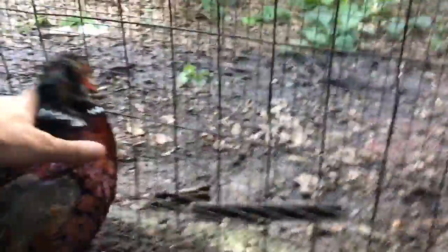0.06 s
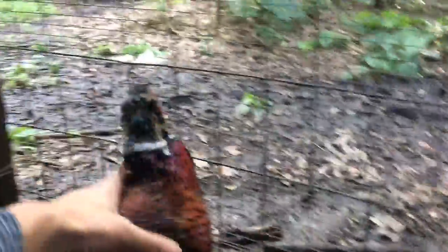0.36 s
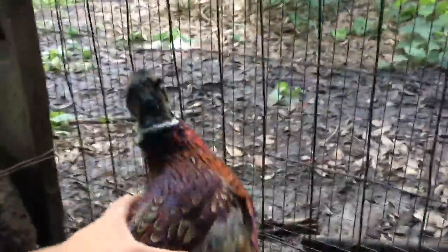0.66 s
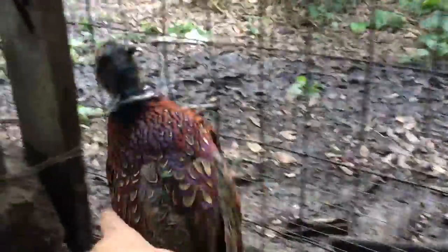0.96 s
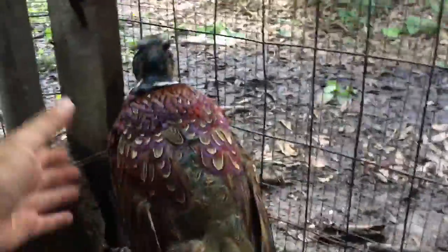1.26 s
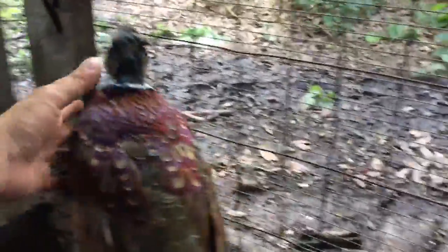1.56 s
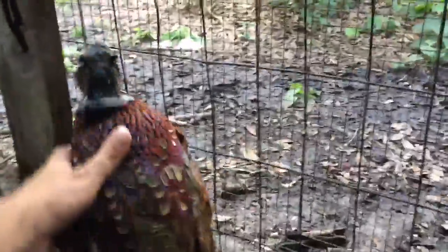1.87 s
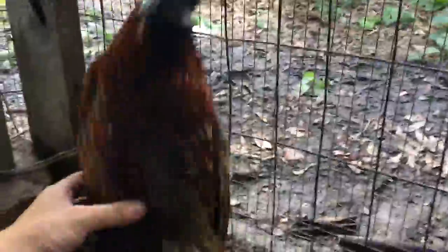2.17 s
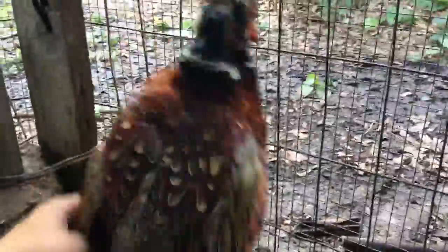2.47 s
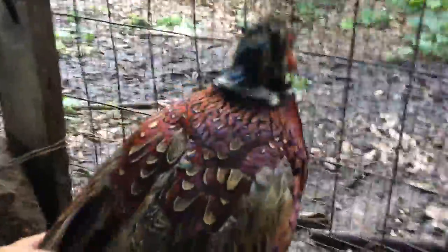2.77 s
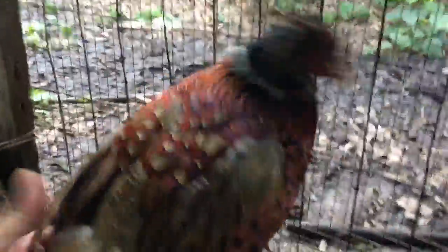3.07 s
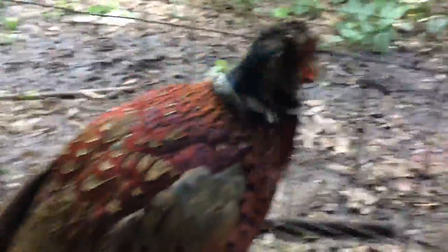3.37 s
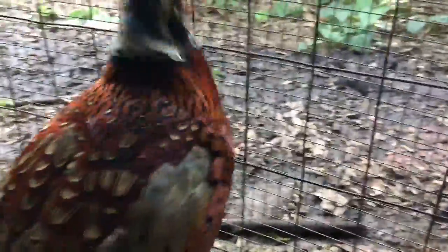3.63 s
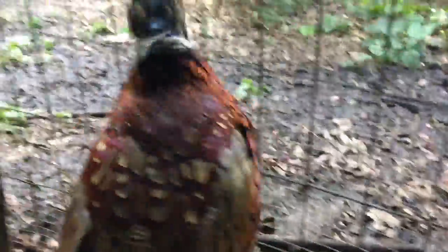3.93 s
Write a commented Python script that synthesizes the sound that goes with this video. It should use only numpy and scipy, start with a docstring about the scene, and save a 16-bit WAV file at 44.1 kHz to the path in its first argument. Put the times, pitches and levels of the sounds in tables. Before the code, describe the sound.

High, falling pheasant whistles mix with peeps and low clucks, broken halfway by a short raspy squawk. A hand brushes feathers near the microphone and dry leaves and twigs crackle, with a low outdoor rumble behind.

```python
"""In a wire pen strewn with dry leaves, a pheasant is handled close by.
Birds give long falling whistles, short peeps, soft clucks, a hoarse chirp and one harsh squawk made
with both sides of the voice box. Twigs and leaves snap and crunch in showers of tiny breaks, and a
hand rubs over feathers. Birds, twigs and leaves echo briefly around the pen; faint high squeaks,
a low rumble and quiet outdoor air lie behind them."""
import sys
import numpy as np
from scipy import signal
from scipy.fft import rfft, irfft, next_fast_len
from scipy.io import wavfile

SR = 44100
rng = np.random.default_rng(int(sys.argv[2]) if len(sys.argv) > 2 else 0)


def digitize_waveform(pressure):
    """Quantize a signal to 16-bit integers and store it at the path in sys.argv[1].

    Rows of a 2-D input are taken as channels; values are limited to [-1, 1].
    """
    field = np.atleast_2d(pressure).T
    bounded = np.clip(field, -1, 1)
    quanta = np.round(bounded * 32767).astype(np.int16)
    wavfile.write(sys.argv[1], SR, quanta)


N = 176400  # 4 seconds


# Long falling whistles, one list of points each: (time [s], pitch [Hz], level [dB])
WHISTLE_PATHS = [
    [(.21, 4480, -70), (.25, 4360, -61), (.312, 3780, -58.5), (.321, 3600, -68), (.326, 3460, -61.5),
     (.356, 3120, -51.5), (.39, 2934, -60), (.41, 2640, -57), (.43, 2270, -45.5), (.442, 2120, -55)],
    [(1.04, 4650, -68), (1.11, 4370, -64), (1.14, 3830, -61), (1.17, 3674, -49.5), (1.2, 3500, -50.5),
     (1.236, 3240, -51.5), (1.254, 2850, -64.5), (1.275, 2570, -47), (1.29, 2450, -62)],
    [(2.423, 3600, -57), (2.47, 3570, -62), (2.515, 3243, -59), (2.526, 3070, -60), (2.53, 2690, -52.5),
     (2.548, 2586, -47.5), (2.561, 2460, -48)],
    [(3.26, 4560, -64), (3.28, 4580, -62.5), (3.335, 4190, -62), (3.352, 3900, -72), (3.38, 3350, -56),
     (3.387, 3140, -48.5), (3.412, 2764, -66), (3.424, 2483, -50.5), (3.447, 2210, -60)],
]
# The overtone an octave above each whistle: (level against the main tone [dB])
WHISTLE_OCTAVES = [-24, -33, -36, -27]
# Short thin peeps: (start [s], length [s], first pitch [Hz], last pitch [Hz], level [dB])
PEEP_NOTES = [(0.362, 0.094, 4130, 3500, -71), (1.676, 0.058, 3770, 3120, -64),
              (3.628, 0.053, 2930, 2930, -65.5), (3.671, 0.035, 3070, 2990, -58.5)]

def whistles():
    """Birds give long falling whistles and short peeps."""
    out = np.zeros(N)
    for path, octave_db in zip(WHISTLE_PATHS, WHISTLE_OCTAVES):
        start, (hz, db) = curve(path)
        add(out, start, whistle(hz, db, octave_db))
    for start, length, first_hz, last_hz, db in PEEP_NOTES:
        n = int(length * SR)
        add(out, start, whistle(np.linspace(first_hz, last_hz, n), db) * fade(n, 0.012))
    return out


def whistle(hz, db, octave_db=-34, buzz_hz=330, clean_db=-47.5, flutter_db=3.0):
    """One trembling bird note: buzzy where it is soft, nearly clean above clean_db."""
    n = len(hz)
    softness = np.clip((clean_db - db) / 14, .2, 1)
    tremble = 0.012 * (.5 + softness) * wobble(n, 450)
    waver = 0.00754 * wobble(n, 60)
    hz = hz * (1 + tremble + waver)
    buzz = 0.28 * softness * tone(buzz_hz * (1 + 0.243 * wobble(n, 80)))
    loudness = amp(db + flutter_db * wobble(n, 80) - 0.85) * fade(n, .004)
    return loudness * unit(1 + buzz) * (tone(hz) + amp(octave_db) * tone(2 * hz))


# The squawk's two voices:
# (time [s], low pitch [Hz], low level [dB], high pitch [Hz], high level [dB], roughness [0-1])
SQUAWK_PATH = [(1.766, 2614, -71, 4380, -63, 0.3), (1.786, 2650, -54, 4800, -58.5, 0.77),
               (1.81, 2780, -57, 5160, -53, 1), (1.824, 2654, -51, 4850, -59, 0.84),
               (1.834, 2463, -44, 4430, -49.5, 0.97), (1.853, 2155, -44.5, 4000, -48.5, 0.7),
               (1.868, 1870, -51.5, 3870, -62.5, 1), (1.883, 1425, -54, 3940, -70, 0.9),
               (1.895, 1260, -58, 3900, -74, 0.5)]
# Tone colour of the hiss in the squawk: (frequency [Hz], level [dB])
SQUAWK_HISS_COLOUR = [(1000, -38), (6000, 0), (8600, -2), (10000, -17), (18000, -40)]

def squawk(rasp_hz=391, jitter=0.028, sum_db=-16, hiss_db=-12):
    """The two sides of a bird's voice box rise and fall together, rasping and hissing."""
    out = np.zeros(N)
    start, (low_hz, low_db, high_hz, high_db, roughness) = curve(SQUAWK_PATH)
    n = len(low_hz)
    shake = 1 + jitter * roughness * wobble(n, 900)
    rattle = tone(rasp_hz * (1 + 0.235 * wobble(n, 153.6)))
    rasp = roughness * (rattle + 0.96 * wobble(n, 300))
    low_voice = amp(low_db) * tone(low_hz * shake) * (1 + 0.71 * rasp)
    sum_tone = amp(sum_db) * tone((low_hz + high_hz) * shake)  # the two pitches added make a third
    high_voice = (tone(high_hz * shake) + sum_tone) * (1 + 0.35 * rasp)
    hiss = 2 * roughness * amp(hiss_db) * colour(rng.standard_normal(n), SQUAWK_HISS_COLOUR)
    call = low_voice + amp(high_db) * (high_voice + hiss)
    add(out, start, amp(-2.0) * call * fade(n, .004))
    return out


# Soft clucks: (start [s], length [s], pitch [Hz], level [dB], change to harmonics 3 and up [dB])
CLUCK_NOTES = [(0.217, 0.035, 545, -55, -6), (0.681, 0.067, 538, -59, 9.5), (1.254, 0.051, 532, -57, 3),
               (1.298, 0.042, 512, -49, -13), (1.33, 0.029, 544, -52, -12), (1.441, 0.073, 532, -57.5, 2),
               (1.502, 0.059, 504, -50.5, -8.5), (2.315, 0.047, 505, -49.5, -18),
               (2.671, 0.034, 510, -53, -1), (2.693, 0.043, 603, -58, -7), (3.261, 0.063, 525, -61, 31),
               (3.384, 0.036, 629, -55, -2), (3.815, 0.096, 515, -57, -25)]
# A cluck's harmonics, the tones at 1 to 6 times its pitch: (level [dB])
CLUCK_HARMONICS = [-4.5, -1, -9, -8.5, -18.5, -13.5]

def clucks(dip=0.0687, jitter=0.026):
    """Low notes made with the beak closed, each dipping in pitch halfway through."""
    out = np.zeros(N)
    for start, length, pitch, db, upper_db in CLUCK_NOTES:
        n = int(length * SR)
        hz = pitch * (1 + dip * np.linspace(-1, 1, n) ** 2 + jitter * wobble(n, 180))
        note = sum(amp(harmonic_db + upper_db * (k >= 3)) * tone(k * hz)
                   for k, harmonic_db in enumerate(CLUCK_HARMONICS, start=1))
        add(out, start, amp(db) * unit(note) * fade(n, 0.016))
    return out


def chirp(start_s=2.467, length_s=.04, first_hz=5000, last_hz=4560, db=-54, jitter=.06):
    """One sudden falling bird note, hoarse because its pitch shakes very fast."""
    out, n = np.zeros(N), int(length_s * SR)
    hz = np.linspace(first_hz, last_hz, n) * (1 + jitter * wobble(n, 1000))
    add(out, start_s, amp(db) * tone(hz) * np.linspace(1, .2, n) * fade(n, 0.0019))
    return out


# Snapping twigs and leaves:
# (time [s], body [dB], middle [dB], treble [dB], fade time [s], tick [dB], ring pitch [Hz])
TWIG_SNAPS = [(.438, -52, -50.5, -54.5, 0.015, -50, 2190), (0.868, -48, -49, -59, 0.0071, -63, 3790),
              (1.048, -64, -55, -56, 0.01, -66, 3530), (1.111, -52.5, -58.5, -68, 0.021, -72, 2020),
              (1.394, -53.5, -57.5, -58, 0.04, -64, 3180), (2.005, -51.5, -45, -49, .023, -58, 2070),
              (2.093, -41.5, -46, -61, 0.022, -59, 1896), (2.178, -49.5, -43, -45, 0.022, -46, 2610),
              (2.231, -46.5, -61, -50, 0.0034, -42, 2970), (2.349, -50, -55, -70, .0038, -62, 1490),
              (2.374, -66, -57.5, -56, 0.018, -60, 3540), (2.388, -55.5, -47, -56, 0.029, -68, 2060),
              (2.471, -55.5, -46.5, -60, 0.017, -66, 2200), (2.669, -50, -53, -76, 0.0051, -73, 1840),
              (2.851, -49, -51, -49, 0.0045, -61, 2250), (2.864, -45.5, -53.5, -75, 0.017, -78, 1880),
              (2.977, -57.5, -52.5, -50.5, 0.028, -57, 2160), (3.306, -70, -56, -56, .003, -65, 3500),
              (3.775, -42.5, -48, -51, 0.0041, -36, 1880), (3.939, -48, -45.5, -56, .0063, -35.5, 1650)]
# Tone colour of a snap's low body: (frequency [Hz], level [dB])
BODY_COLOUR = [(100, -35), (400, -2.5), (750, 0), (1100, 4.5), (1600, -4.5), (2500, -7), (4500, -16.5),
               (18000, -74)]
# Tone colour of its middle: (frequency [times the ring pitch], level [dB])
MIDDLE_COLOUR = [(.05, -31), (.55, -23), (.8, -2), (1.15, 0.5), (1.5, -11), (1.85, -10), (2.4, -13),
                 (9, -65)]
# Tone colour of its treble: (frequency [Hz], level [dB])
TREBLE_COLOUR = [(100, -51), (4800, -24), (6000, 2), (8500, 2.5), (10200, -4.5), (11500, 1.5), (14000, -10),
                 (18000, -11.5)]
# Tone colour of its bright opening tick: (frequency [Hz], level [dB])
TICK_COLOUR = [(100, -50), (5000, -5), (8000, -2), (11500, 8), (14500, 8), (18000, 4)]
# The notes a twig rings with: (pitch [times the ring pitch], level [dB], time to fall 60 dB [s])
TWIG_NOTES = [(.73, -9.5, 0.031), (1, 7, 0.052), (1.27, -6.5, 0.041)]

def snaps(crack_s=0.00096, tick_s=0.0008, tick_tail_s=0.011, tick_tail_db=-27, knock_db=-10):
    """A twig or leaf breaks with a tick, a ringing knock and a crumble whose treble dies first."""
    out, t = np.zeros(N), np.arange(SR // 5) / SR
    rise = np.minimum(t / 0.00028, 1)
    crack = 0.54 * np.exp(-t / crack_s)
    tick_shape = rise * (np.exp(-t / tick_s) + amp(tick_tail_db) * np.exp(-t / tick_tail_s))
    for start, body_db, middle_db, treble_db, fade_s, tick_db, ring_hz in TWIG_SNAPS:
        middle_colour = [(ratio * ring_hz, db) for ratio, db in MIDDLE_COLOUR]
        bands = [(body_db, BODY_COLOUR, fade_s),
                 (middle_db, middle_colour, fade_s),
                 (treble_db, TREBLE_COLOUR, fade_s / 2)]
        for db, band_colour, band_fade_s in bands:
            shape = rise * (np.exp(-t / band_fade_s) + crack)
            crumble = colour(crackle(len(t), per_s=2400, spread_db=2.15, hiss=0.56), band_colour)
            add(out, start, amp(db) * shape * crumble)
        knock = sum(amp(db - 60 * t / ring_s) * np.sin(2 * np.pi * ratio * ring_hz * t)
                    for ratio, db, ring_s in TWIG_NOTES)
        tick = tick_shape * colour(rng.choice([-1., 1.], len(t)), TICK_COLOUR)
        add(out, start, amp(middle_db + knock_db) * knock + amp(tick_db) * tick)
    return out


# Soft crunches in the dry leaves: (start [s], length [s], level [dB])
LEAF_CRUNCHES = [(0.155, 0.15, -59.5), (0.452, 0.07, -52.5), (0.689, 0.045, -57.5), (0.871, 0.048, -59),
                 (1.124, 0.049, -58.5), (2.284, 0.049, -48.5), (2.413, 0.15, -59), (2.804, 0.04, -53.5),
                 (2.992, 0.061, -56.5), (3.472, 0.072, -50), (3.784, 0.031, -51.5), (3.941, 0.03, -49.5)]
# Tone colour of a crunch: (frequency [Hz], level [dB])
CRUNCH_COLOUR = [(100, -24), (350, 5.5), (700, -1.5), (1100, 3.5), (2200, 0), (3200, -5.5), (5000, -13),
                 (10000, -18.5), (18000, -28)]

def crunches():
    """Leaves are pressed down: many tiny breaks swell quickly, then fade."""
    loudness = np.zeros(N)
    for start, length, db in LEAF_CRUNCHES:
        progress = np.linspace(0, 1, int(length * SR))
        add(loudness, start, amp(db) * abs(np.sin(np.pi * progress ** 0.38)))
    return loudness * colour(crackle(N, per_s=1800, spread_db=2.8, hiss=0.76), CRUNCH_COLOUR)


# How loudly the hand brushes the feathers: (time [s], level [dB])
HAND_STROKES = [(0, -62), (.14, -72), (.42, -72), (.62, -64), (.77, -63.5), (.98, -59.5), (1.17, -63.5),
                (1.331, -70), (1.97, -66.5), (2.14, -57), (2.3, -55.5), (2.47, -55.5), (2.6, -59.5),
                (2.74, -67), (2.9, -58), (2.95, -65), (3.14, -67), (3.23, -61), (3.34, -66.5),
                (3.51, -57.5), (3.68, -61), (3.76, -67), (3.89, -59), (4, -64.5)]
# Tone colour of rubbed feathers: (frequency [Hz], level [dB])
FEATHER_COLOUR = [(100, -25), (450, 13), (1000, 7.5), (2200, 3.5), (3500, 0.5), (5500, -1.5), (10200, -6),
                  (15000, -7), (18000, -16)]

def feathers(patchy_db=2.3, split_hz=4500):
    """A hand rubs feathers: soft scrapes and the crisp crackle of barbs come and go separately."""
    def rubbing():
        patches = amp(patchy_db * wobble(N, 35))
        return patches * colour(crackle(N, per_s=900, spread_db=3.2, hiss=1.0), FEATHER_COLOUR)

    scrapes = signal.lfilter(*signal.butter(2, split_hz, "low", fs=SR), rubbing())
    barbs = signal.lfilter(*signal.butter(2, split_hz, "high", fs=SR), rubbing())
    return amp(over_time(HAND_STROKES) - 1.5) * (scrapes + barbs)


# Faint high squeaks: (start [s], length [s], first pitch [Hz], last pitch [Hz], level [dB])
SQUEAK_NOTES = [(0.552, 0.21, 11750, 11500, -73), (0.58, 0.17, 9700, 9800, -76),
                (.72, 0.14, 9150, 9050, -78)]

def squeaks(fuzz_hz=330):
    """Thin, very high tones, fuzzy because their strength flickers fast."""
    out = np.zeros(N)
    for start, length, first_hz, last_hz, db in SQUEAK_NOTES:
        n = int(length * SR)
        glide = tone(np.linspace(first_hz, last_hz, n))
        add(out, start, amp(db) * glide * wobble(n, fuzz_hz) * fade(n, 0.036))
    return out


# Tone colour of the low rumble: (frequency [Hz], level [dB])
RUMBLE_COLOUR = [(20, -36), (31, -29), (45, -0.5), (65, 0.5), (85, 0), (120, -2.5), (160, -7.5), (240, -14),
                 (385, -20), (470, -27), (700, -50.5), (2000, -84)]
# How the rumble swells and sinks: (time [s], level change [dB])
RUMBLE_SWELLS = [(0, -1), (.25, 0), (.5, 1.5), (.72, 0), (.85, 0.5), (1.05, 2.5), (1.4, -0.5), (1.68, -4.5),
                 (1.85, 0), (2.15, -0.5), (2.32, 4.5), (2.6, 2.5), (2.88, -5), (3.02, 1), (3.3, -1.5),
                 (3.55, 1), (4, 1.5)]
# Tone colour of the outdoor air: (frequency [Hz], level [dB])
AIR_COLOUR = [(100, -12), (300, 0), (500, -1.5), (750, -1.5), (1500, -3), (3000, -10), (5000, -18),
              (9000, -22), (14000, -24), (18000, -33)]

def background(rumble_db=-44.5, waver_db=1.02, air_db=-63):
    """A low rumble swells and sinks under the steady hush of outdoor air."""
    swell_db = over_time(RUMBLE_SWELLS) + waver_db * wobble(N, 11)
    rumble = amp(rumble_db + swell_db) * colour(rng.standard_normal(N), RUMBLE_COLOUR)
    air = amp(air_db) * colour(rng.standard_normal(N), AIR_COLOUR)
    return rumble + air


# Echoes from posts and walls: (delay [s], level before echo_db is added [dB])
PEN_ECHOES = [(.0072, -16.5), (.015, -35), (.027, -11.5), (.046, -20.5)]
# How long sound lingers in the pen: (frequency [Hz], time to fall 60 dB [s])
PEN_FADE_TIMES = [(200, 0.51), (1000, 0.25), (2500, 0.21), (5000, 0.1), (10000, 0.11), (18000, 0.08)]

def pen(sound, tail_db, echo_db):
    """Sound arrives directly, then as a few near echoes and a short, blurred tail."""
    n = SR // 2
    scatter = rng.standard_normal(n) * (rng.random(n) < .1)
    hz, t, bands = signal.stft(scatter, SR, nperseg=256)
    fade_s = at_frequency(PEN_FADE_TIMES, hz)[:, None]
    tail = signal.istft(bands * amp(-60 * t / fade_s), SR, nperseg=256)[1]
    tail *= np.minimum(np.arange(len(tail)) / SR / 0.0038, 1) ** 2  # the tail eases in
    response = amp(tail_db) * tail / np.linalg.norm(tail)
    response[0] += 1  # the direct sound
    for delay, db in PEN_ECHOES:
        add(response, delay, amp(db + echo_db) * np.array([.25, .5, .25]))  # a slightly dulled copy
    return signal.fftconvolve(sound, response)[:N]


def amp(db):
    """Turns decibels into a number to multiply by."""
    return 10 ** (np.asarray(db) / 20)


def unit(x):
    """Scales a signal to an average strength (rms) of 1."""
    return x / np.sqrt(np.mean(x ** 2) + 1e-20)


def tone(hz):
    """A pure tone of strength 1 that follows a pitch curve."""
    return np.sqrt(2) * np.sin(2 * np.pi * np.cumsum(hz) / SR)


def crackle(size, per_s, spread_db, hiss):
    """Tiny clicks of uneven size over a smooth hiss."""
    hits = rng.random(size) < per_s / SR
    strengths = amp(spread_db * np.minimum(rng.exponential(1, size), 4))
    clicks = hits * strengths * rng.choice([-1, 1], size)
    return unit(clicks) + hiss * rng.standard_normal(size)


def wobble(size, hz):
    """A smooth random wiggle, up to about hz times a second."""
    step = max(int(SR / (10 * hz)), 1)
    n = next_fast_len(size // step + 200)
    keep_slow = np.exp(-(np.fft.rfftfreq(n, step / SR) / hz) ** 2)
    slow = unit(irfft(rfft(rng.standard_normal(n)) * keep_slow, n))
    return np.interp(np.arange(size) / step, np.arange(n), slow)


def colour(x, points):
    """Gives a signal a tone colour (its balance of lows and highs), at strength 1."""
    gains = amp(at_frequency(points, np.fft.rfftfreq(len(x), 1 / SR)))
    return unit(irfft(rfft(x) * gains, len(x)))


def at_frequency(points, hz):
    """Reads between a table's frequencies, with octaves evenly spaced."""
    frequencies, values = np.transpose(points)
    return np.interp(np.log(hz + 1), np.log(frequencies), values)


def over_time(points):
    """Joins (time, value) points with straight lines across the whole scene."""
    return np.interp(np.arange(N) / SR, *np.transpose(points))


def curve(rows):
    """Gives a path's start time and its other columns at every sample."""
    times, *columns = np.transpose(rows)
    t = np.arange(times[0], times[-1], 1 / SR)
    return times[0], [np.interp(t, times, column) for column in columns]


def fade(size, edge_s):
    """A soft start and end."""
    k = np.arange(size)
    return np.sin(np.pi / 2 * np.clip(np.minimum(k, size - k) / (edge_s * SR), 0, 1)) ** 2


def add(mix, start_s, sound):
    """Mixes a sound in at a given time."""
    part = mix[max(round(start_s * SR), 0):][:len(sound)]
    part += sound[:len(part)]


def scene():
    """Birds and dry leaves echo in the pen; feathers, squeaks and background join without echo."""
    birds = pen(whistles() + squawk() + chirp(), tail_db=-9.5, echo_db=-1)
    birds += pen(clucks(), tail_db=-17.0, echo_db=-5.5)
    leaves = amp(-2.0) * pen(snaps() + crunches(), tail_db=-2.5, echo_db=-5.5)
    return (birds + leaves + feathers() + squeaks() + background())[None]


def record(dry):
    """Cuts away the highest treble, above 18300 Hz."""
    low_pass = signal.firwin(511, 18300, window=("kaiser", 9), fs=SR)
    return signal.oaconvolve(dry, low_pass[None], "same")


dry = scene()
out = record(dry)
digitize_waveform(out)
```